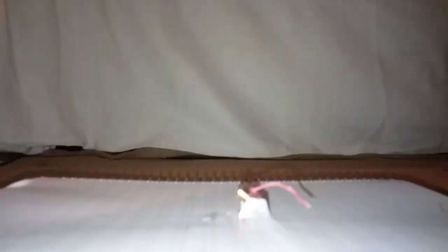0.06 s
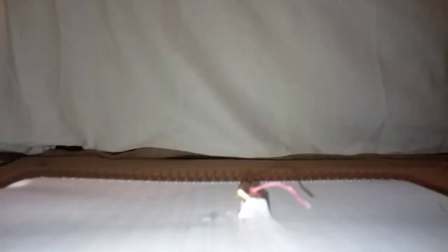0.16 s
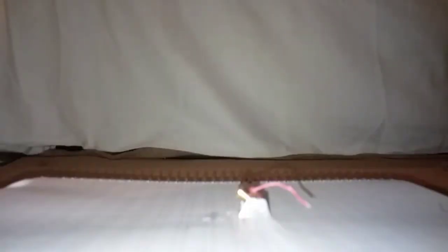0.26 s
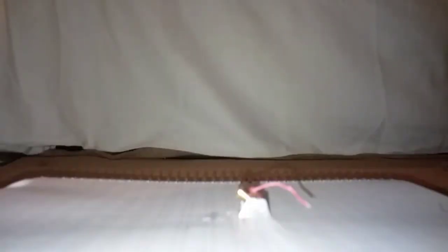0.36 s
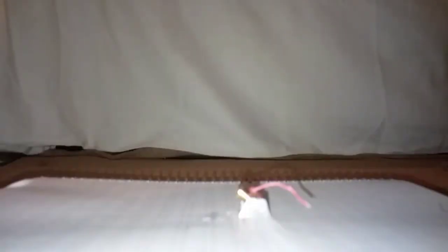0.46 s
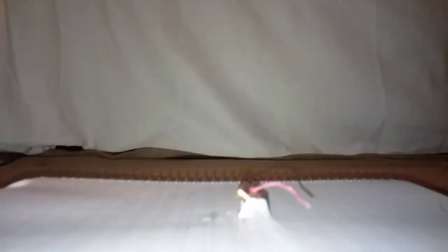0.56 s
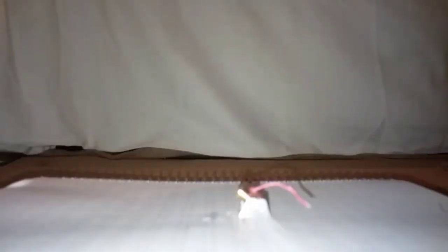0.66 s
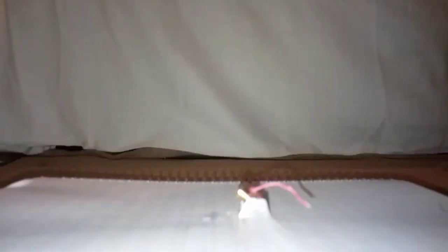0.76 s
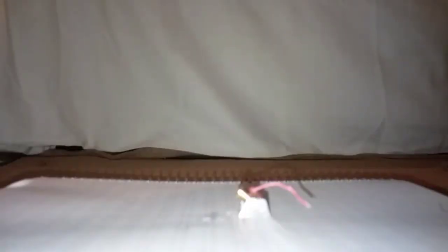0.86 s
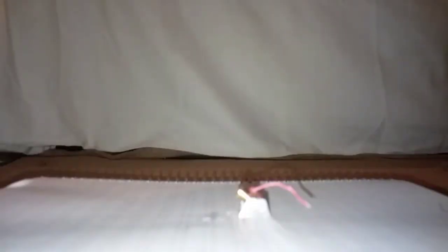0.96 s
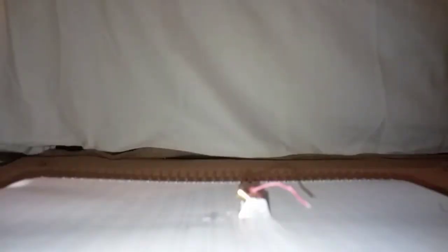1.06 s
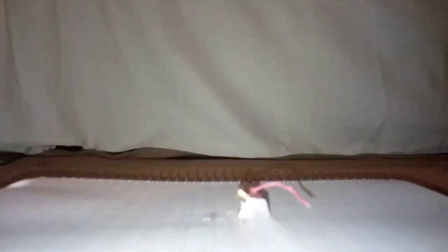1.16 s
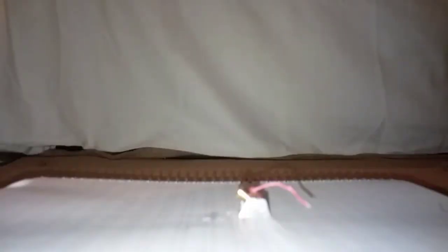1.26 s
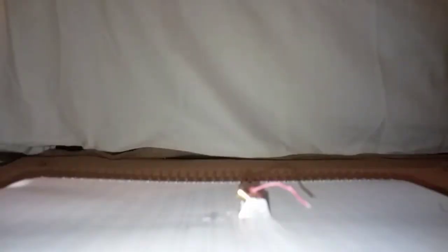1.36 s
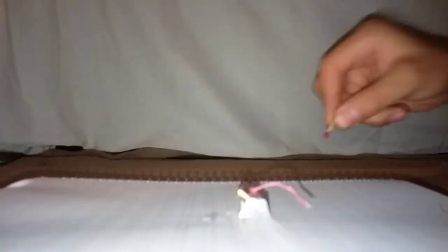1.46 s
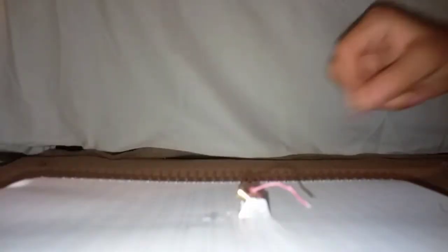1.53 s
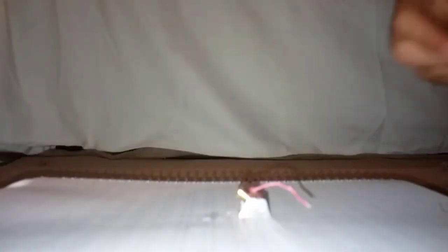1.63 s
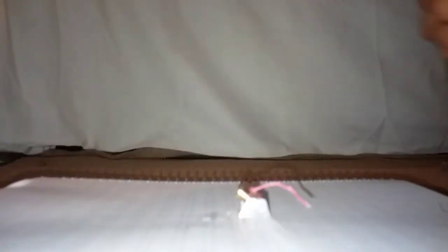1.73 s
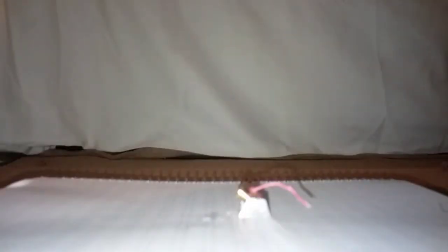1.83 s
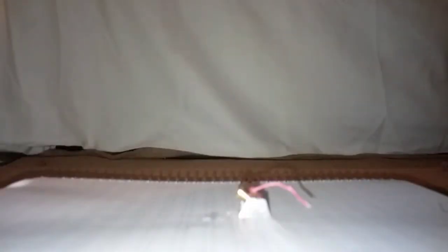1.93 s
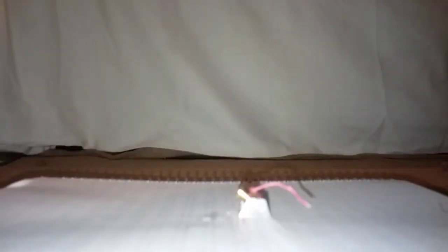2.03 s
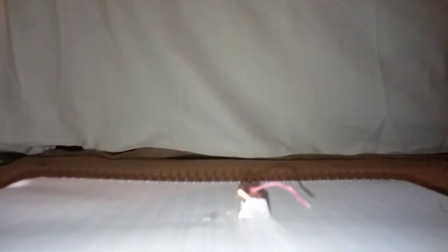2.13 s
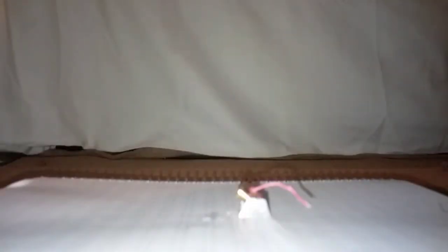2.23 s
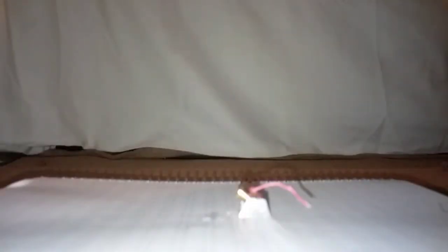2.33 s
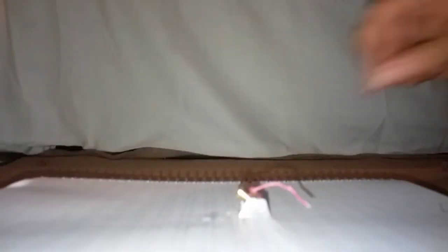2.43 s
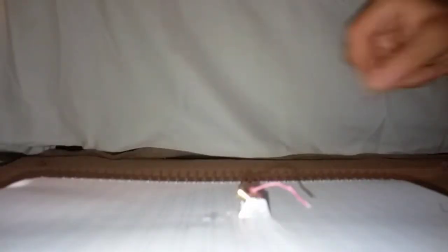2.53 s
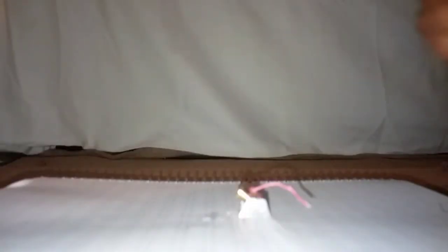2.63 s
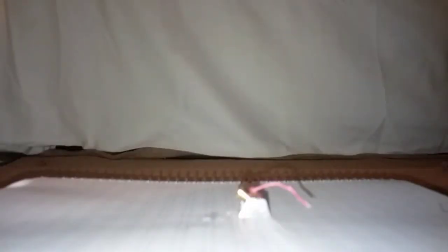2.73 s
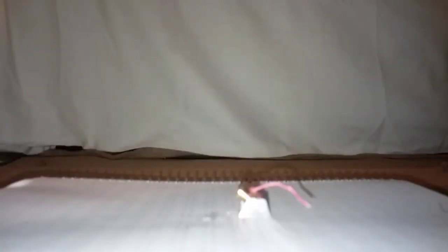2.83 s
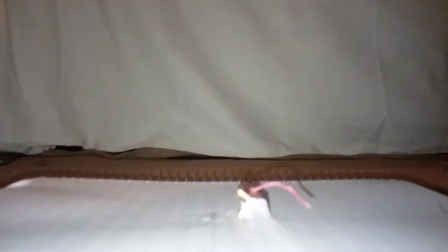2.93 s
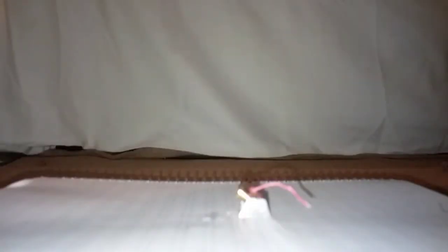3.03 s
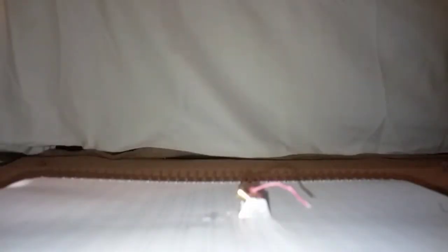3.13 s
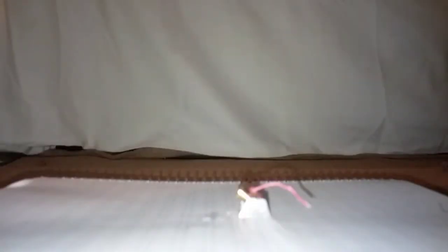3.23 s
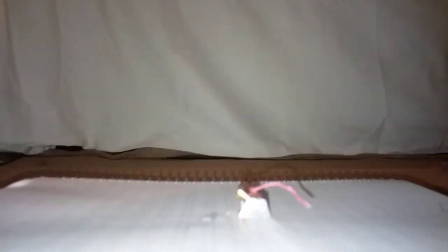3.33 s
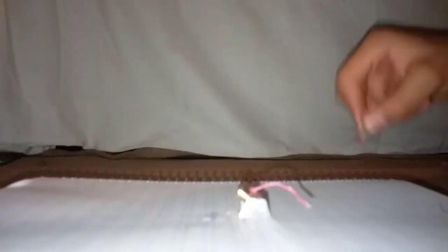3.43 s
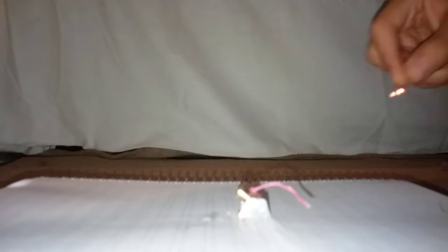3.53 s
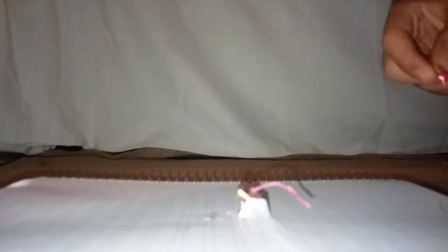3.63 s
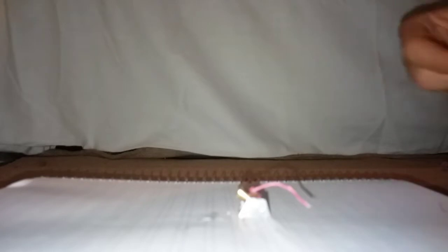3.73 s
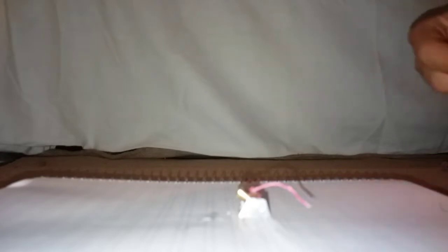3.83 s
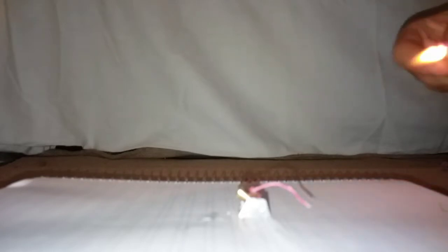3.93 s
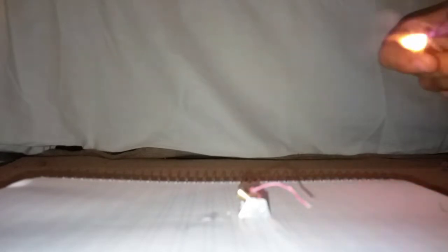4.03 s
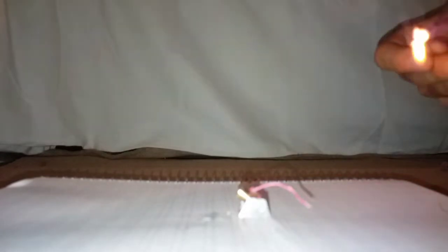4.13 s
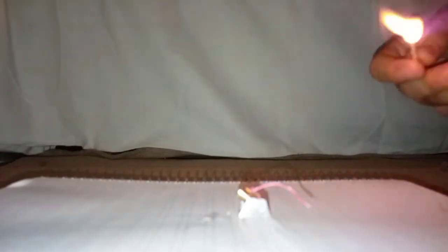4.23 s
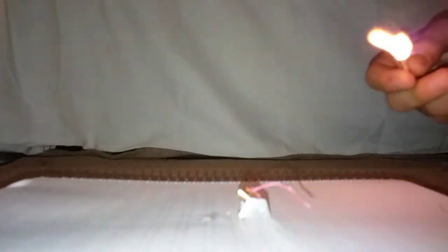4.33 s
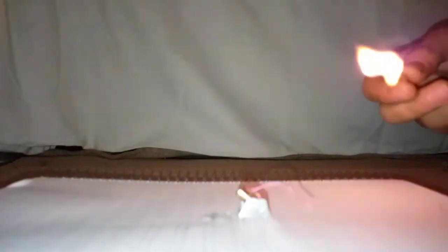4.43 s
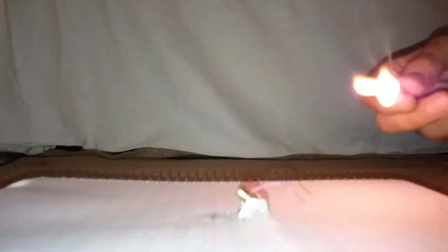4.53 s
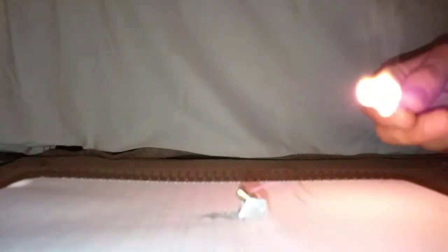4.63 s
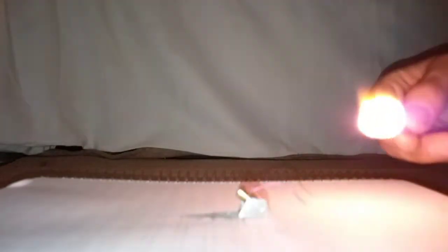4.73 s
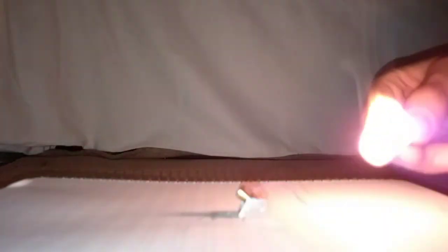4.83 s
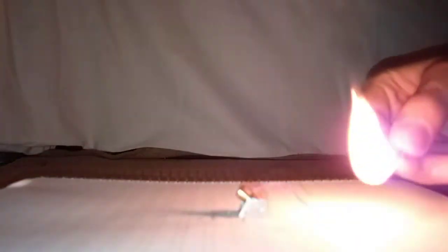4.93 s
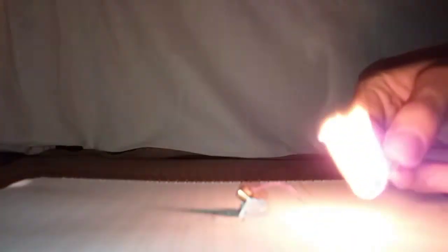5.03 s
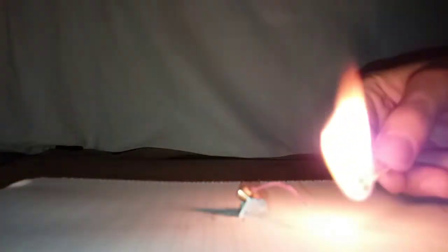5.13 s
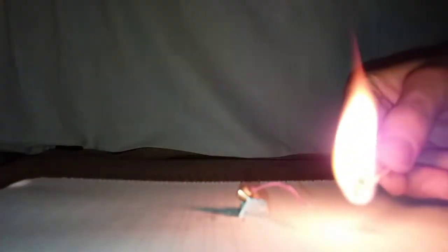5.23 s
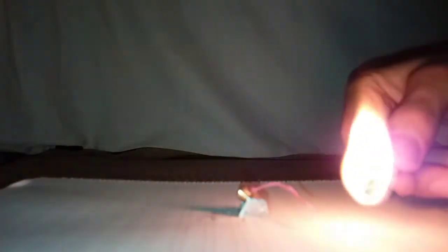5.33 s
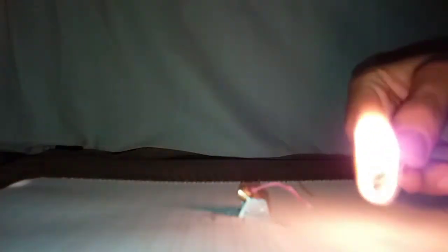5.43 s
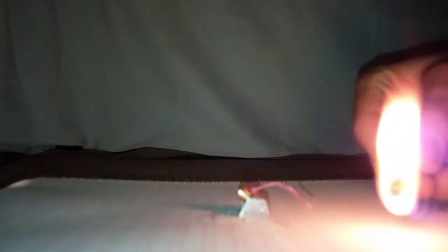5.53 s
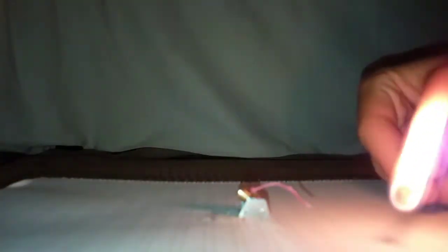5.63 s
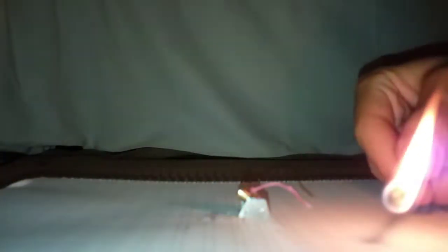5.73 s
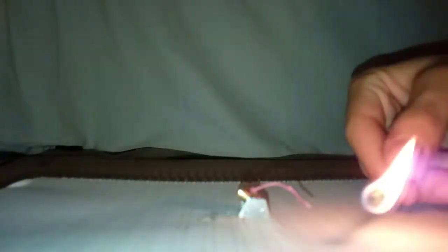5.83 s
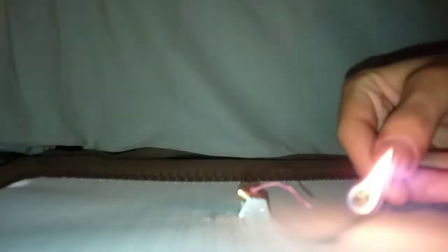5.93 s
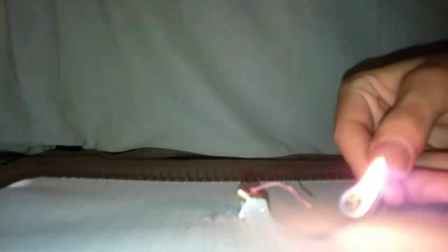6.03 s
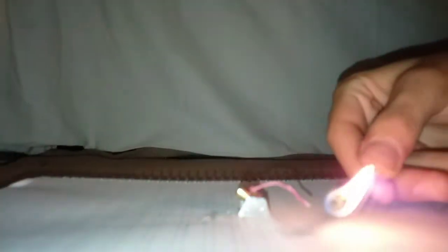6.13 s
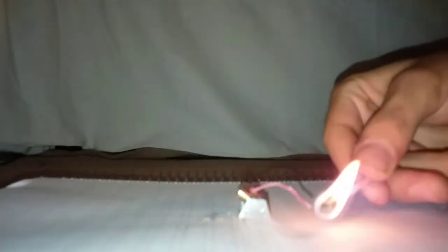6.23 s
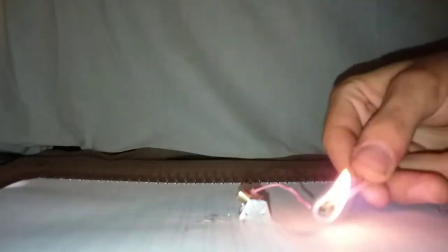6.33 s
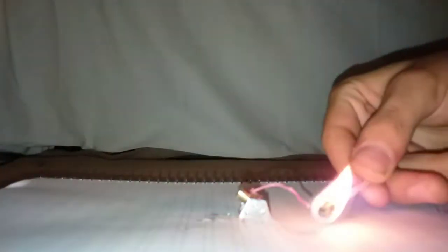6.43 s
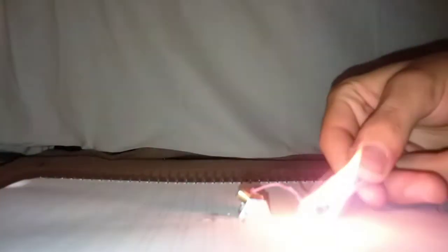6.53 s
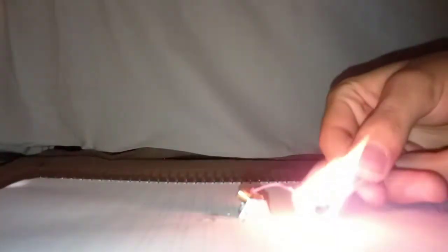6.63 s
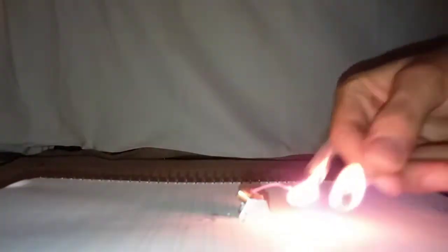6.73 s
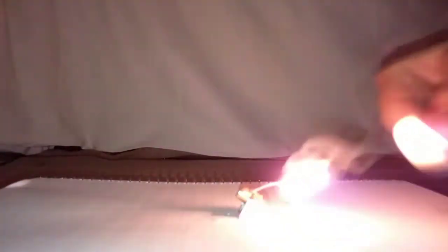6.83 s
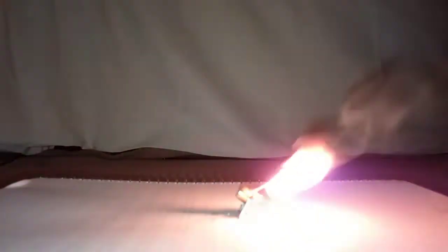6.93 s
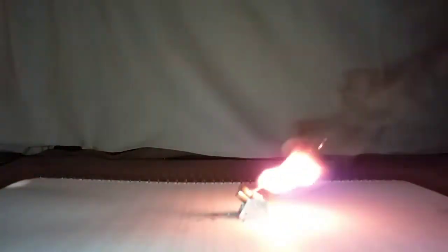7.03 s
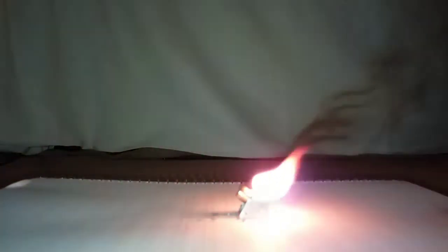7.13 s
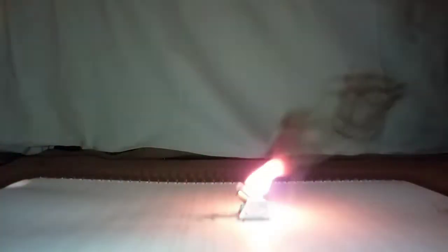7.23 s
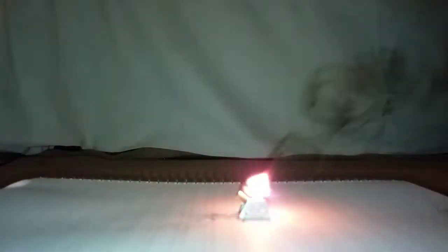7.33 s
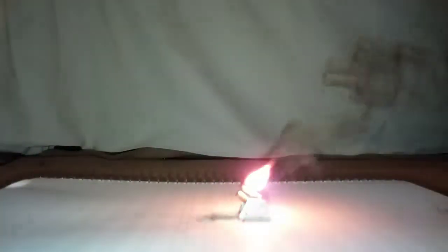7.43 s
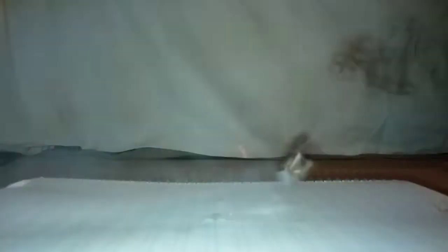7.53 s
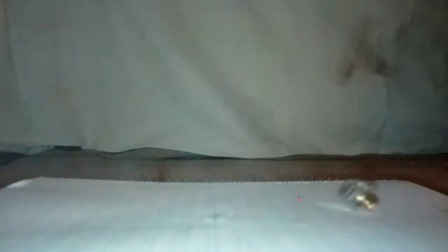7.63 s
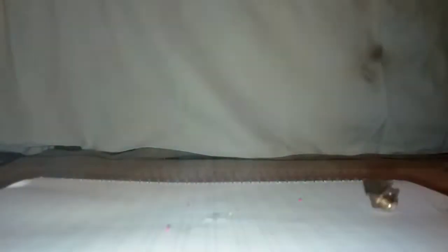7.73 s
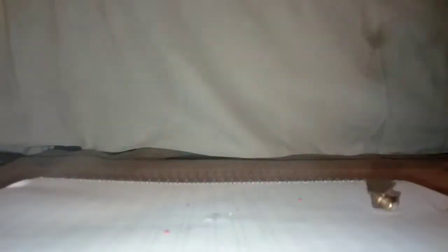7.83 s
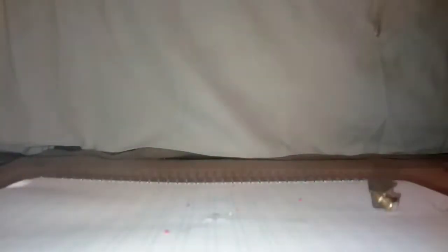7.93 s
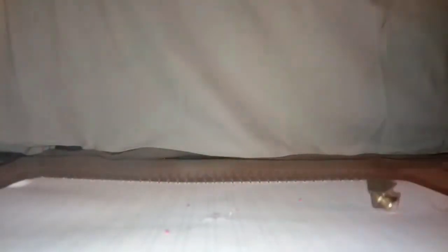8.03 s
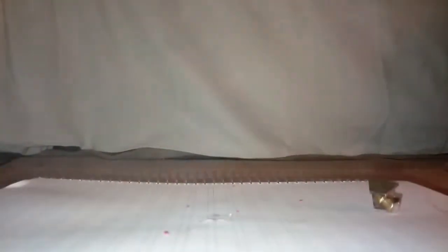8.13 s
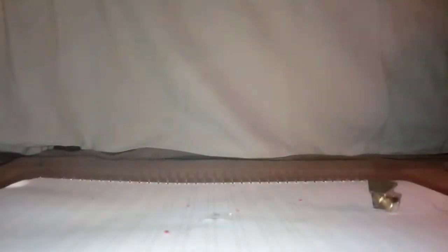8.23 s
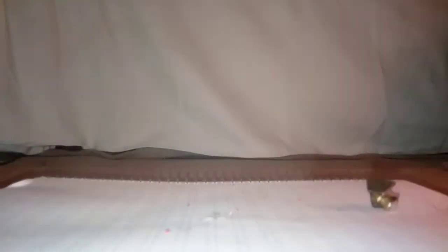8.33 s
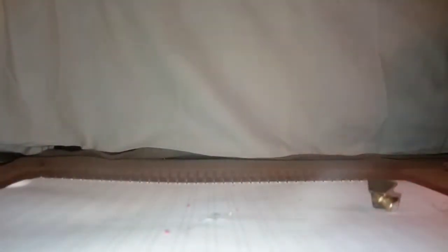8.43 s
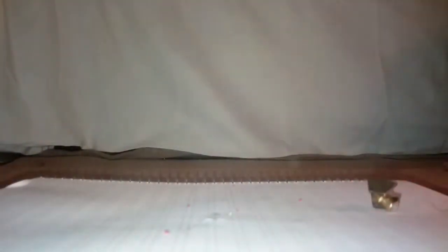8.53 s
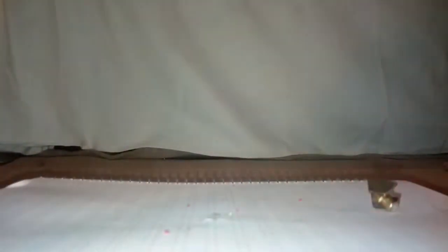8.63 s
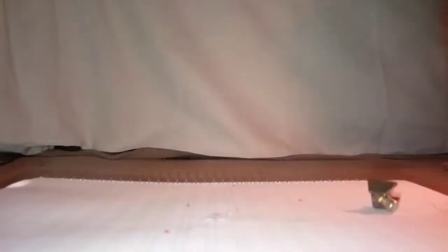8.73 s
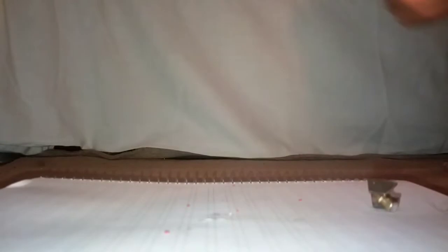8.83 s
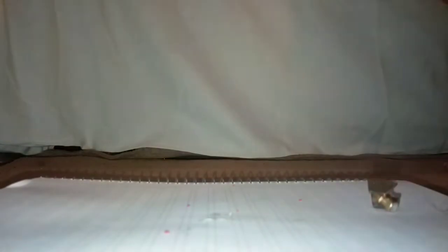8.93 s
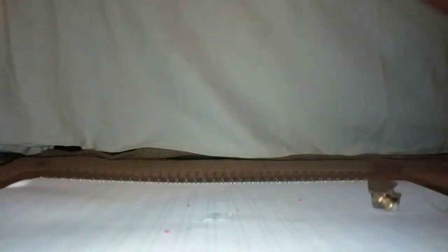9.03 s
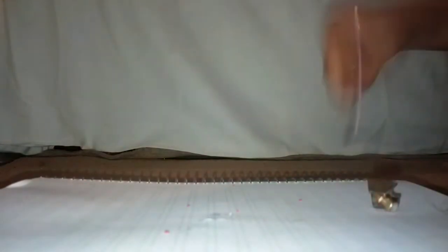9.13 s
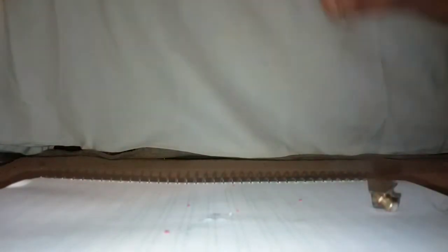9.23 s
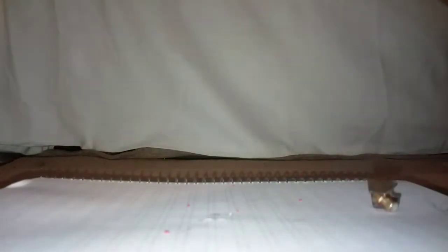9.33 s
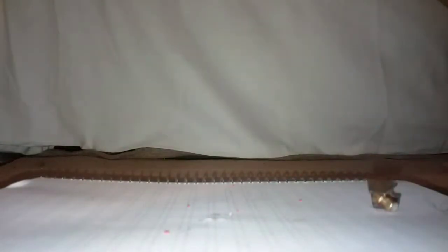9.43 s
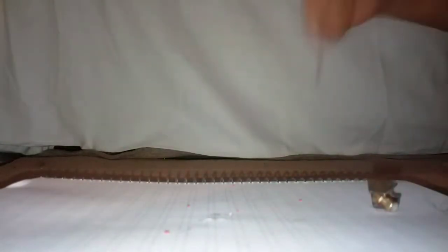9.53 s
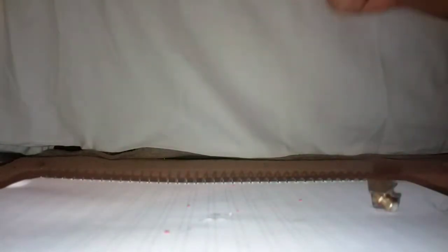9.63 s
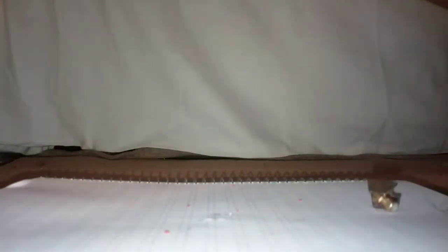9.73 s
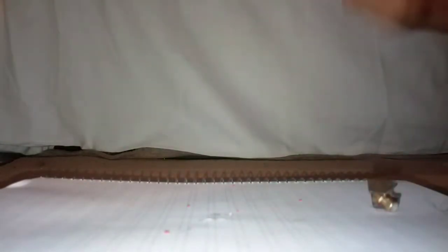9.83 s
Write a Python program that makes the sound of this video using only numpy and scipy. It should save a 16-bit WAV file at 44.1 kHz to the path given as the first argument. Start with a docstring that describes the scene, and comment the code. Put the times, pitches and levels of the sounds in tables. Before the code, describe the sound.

A match scrapes and catches, a fuse sizzles, then a tiny cannon fires one sharp bang in a small room with a low hum.

```python
"""Over a small room's low hum, a match scrapes and snags on its box, grit shaking the cardboard.
It catches, flares and crackles as powder grains burst in hot gas, then lights a tiny cannon's fuse.
The fuse sizzles and spits; the cannon's pressure pulse fills the room, and loose bits clatter down.
A limiter flattens the bang, and gain control keeps the room hushed for a second afterwards."""
import sys
import numpy as np
from scipy import signal
from scipy.io import wavfile
from scipy.ndimage import uniform_filter1d

SR = 44100
rng = np.random.default_rng(int(sys.argv[2]) if len(sys.argv) > 2 else 0)


def put_to_file(sound):
    """Save the sound as 16-bit audio at rate SR, in the file named by the first command-line argument."""
    columns = np.atleast_2d(sound).T  # one column per channel
    safe = np.clip(columns, -1, 1)
    whole_steps = np.round(safe * 32767)
    wavfile.write(sys.argv[1], SR, whole_steps.astype(np.int16))


N = 435266
TIME = np.arange(N) / SR

# spectra of burning powder: (frequency [Hz], level [dB])
GAS_FLUTTER = [(100, -14), (260, 0), (430, -6), (620, 1), (780, 3), (980, -7), (1350, -6), (2000, -27.5),
               (4000, -54.5)]
GRAIN_POP = [(200, -13), (700, -0.5), (2500, 0.5), (5000, -2), (8200, -4), (9200, -13), (12000, -14.5),
             (16000, -5)]
FUSE_SPECTRUM = [(710, -33.5), (1200, -7.5), (1370, -3.5), (1870, -8), (2130, -5), (3360, -6.5),
                 (4500, -6.5), (7910, -7.5), (9110, -16), (12700, -14), (16000, -12.5)]


def amp(db):
    """Decibels to gain."""
    return 10 ** (np.asarray(db) / 20)


def unit_rms(x):
    """Scale to rms 1."""
    return x / np.sqrt(np.mean(x ** 2) + 1e-20)


def lookup(points, hz):
    """Interpolate a table over log frequency."""
    table_hz, value = np.transpose(points)
    return np.interp(np.log(hz + 1), np.log(table_hz), value)


def add(mix, start_s, sound):
    """Mix a sound in at start_s."""
    part = mix[round(start_s * SR):][:len(sound)]
    part += sound[:len(part)]


def band(x, lo_hz, hi_hz):
    """Gentle band-pass."""
    return signal.sosfilt(signal.butter(2, [lo_hz, hi_hz], "band", fs=SR, output="sos"), x)


def click(spectrum, size=4096):
    """Minimum-phase pulse with this spectrum, peak 1."""
    log_gain = np.log(amp(lookup(spectrum, abs(np.fft.fftfreq(size, 1 / SR)))))
    pulse = np.fft.ifft(np.exp(np.conj(signal.hilbert(log_gain)))).real[:size // 2]
    return pulse / abs(pulse).max()


def colour(x, spectrum):
    """Filter by a spectrum, rms 1."""
    return unit_rms(signal.oaconvolve(x, click(spectrum))[:len(x)])


def wander(per_s):
    """Curve through per_s random points a second, rms 1."""
    return unit_rms(np.interp(TIME * per_s, np.arange(N // 20), rng.standard_normal(N // 20)))


def grains(per_s, spread_db):
    """Random impulses, a few much larger than the rest; equal power at any rate."""
    size = amp(spread_db * np.minimum(rng.exponential(1, N), 3.5))
    return unit_rms(size / np.sqrt(per_s) * rng.choice([-1, 1], N) * (rng.random(N) < per_s / SR))


def ring(modes):
    """Decaying modes after one blow, peak 1."""
    t = TIME[:SR // 8]
    wave = sum(amp(db - 60 * t / t60_s) * np.sin(2 * np.pi * (hz * t + rng.random()))
               for hz, db, t60_s in modes)
    return wave / abs(wave).max()


def tail(decay):
    """Dense reflections, each band with its own t60; energy 1."""
    hz, t, bins = signal.stft(rng.standard_normal(SR * 3 // 2), SR, nperseg=256)
    wave = signal.istft(bins * amp(-60 * t / lookup(decay, hz)[:, None]), SR, nperseg=256)[1]
    return wave / np.linalg.norm(wave)


def room_tone(rumble_db=-46.5, hiss_trim_db=-2.0, throb=.25, waver_hz=2.5):
    """A wavering hum over low room noise and thin hiss."""
    # noise spectra and hum partials: (frequency [Hz], level [dB])
    rumble_spectrum = [(18, -57), (30, -24.5), (65, -13), (81, -6.5), (102, -1.5), (173, -12.5),
                       (203, -12.5), (314, -15.5), (346, -26), (412, -19.5), (440, -32.5), (588, -19.5),
                       (797, -30), (837, -31), (1400, -50), (1820, -77), (3080, -120)]
    hiss_spectrum = [(900, -28), (1400, -6.5), (1700, -11), (2200, -11), (3100, -11.5), (3800, 0),
                     (5000, -2.5), (5600, -9), (8000, -10), (9200, -16.5), (16000, -17)]
    hum_partials = [(100, -47.5), (207, -61), (315, -60), (408, -70), (672, -68.5), (782, -68)]
    # hiss drift: (time [s], level before trim [dB])
    hiss_drift = [(.1, -61), (.8, -66.5), (1.2, -65), (1.7, -70.5), (2.3, -71), (3.1, -65), (6.2, -64),
                  (9.8, -66)]
    out = amp(rumble_db) * colour(rng.standard_normal(N), rumble_spectrum)
    hiss_db = np.interp(TIME, *np.transpose(hiss_drift)) + hiss_trim_db
    out += amp(hiss_db) * colour(rng.standard_normal(N), hiss_spectrum)
    for hz, db in hum_partials:
        cycles = np.cumsum(hz + waver_hz * wander(25)) / SR
        out += amp(db) * unit_rms((1 + throb * wander(22)) * np.sin(2 * np.pi * cycles))
    return out


def match_strikes(bite_s=.0096, release_s=.0034, ease_db=24, box_db=-10, top_db=-6.5, wall_half_hz=375):
    """The head drags and snags on grit, shaking the box; each scrape brightens as it speeds up."""
    # strokes: (start [s], end [s], level [dB], pressure crest [0-1], brightness [dB],
    # box wall pitch [Hz], wall ring [dB])
    strokes = [(0.303, 0.342, -53.5, 0.47, -4, 2300, -20), (0.458, 0.502, -60, 0.55, -2, 2300, -9),
               (1.304, 1.351, -23.5, 0.8, 1.5, 2320, -4.5), (1.936, 1.983, -44, .38, -13, 2030, -0.5),
               (2.308, 2.35, -26.5, .64, 0.5, 2270, -4), (3.276, 3.317, -21.5, 0.7, 5, 1950, -9)]
    # head catching on the box: (time [s], snap [dB], box ring [dB])
    snags = [(.876, -37, -54), (1.3005, -42, -35), (1.310, -38, -27), (1.3375, -7, -14), (1.3502, -30, -19),
             (1.881, -43, -39), (2.3365, -10, -17), (2.809, -29, -42), (3.291, -6, -24), (3.315, -22, -10)]
    # matchbox modes: (frequency [Hz], level [dB], t60 [s])
    box_modes = [(340, -18, .03), (1080, -16, .02), (1760, -2, .018), (2060, -4, .016), (2210, 0, .022),
                 (2660, -5, .016), (2850, -5, .018), (5000, -6, .008)]
    # scrape and snag spectra: (frequency [Hz], level [dB])
    rasp_spectrum = [(120, -38.5), (200, -0.5), (482, -9), (683, -8.5), (1080, -7), (1480, -36.5),
                     (1740, -17), (2170, -14.5), (2800, -4.5), (3130, -2.5), (5520, 1.5), (7270, -6.5),
                     (7970, 0), (9230, -13), (16000, -8)]
    snap_spectrum = [(150, -30), (400, -14), (1400, -15), (1800, -3), (2300, 0), (5500, 0), (8000, -5),
                     (9500, -13), (16000, -11)]
    out = np.zeros(N)
    rasp = colour(grains(12000, spread_db=2.5), rasp_spectrum)
    box = unit_rms(signal.oaconvolve(grains(9000, spread_db=2.5), ring(box_modes))[:N])
    top = unit_rms(band(grains(9000, spread_db=2.5), 10500, 17000))
    judder = unit_rms(amp(2.5 * np.tanh(wander(450))))  # stick-slip
    for start_s, end_s, db, crest, bright_db, wall_hz, wall_db in strokes:
        at = np.arange(round(start_s * SR), round(end_s * SR))
        progress = np.linspace(0, 1, len(at))
        bite = np.clip((TIME[at] - start_s) / bite_s, 0, 1)
        release = np.clip((end_s - TIME[at]) / release_s, 0, 1)
        pressure = bite * release * judder[at] * amp(-ease_db * (progress - crest) ** 2)
        wall = band(rng.standard_normal(SR // 4), wall_hz - wall_half_hz, wall_hz + wall_half_hz)
        scrape = rasp[at] + amp(box_db) * box[at] + amp(wall_db) * unit_rms(wall[-len(at):])
        scrape += amp(top_db + bright_db) * progress * top[at]
        add(out, start_s, amp(db) * pressure * scrape)
    snap, knock, t = click(snap_spectrum), ring(box_modes), TIME[:SR // 100]
    for start_s, snap_db, ring_db in snags:
        crumbs = .2 * np.exp(-t / .0008) * rng.standard_normal(len(t))  # grit gives way
        crumbs[0] = 1
        crack = signal.fftconvolve(crumbs, snap)
        add(out, start_s, amp(snap_db) * crack / abs(crack).max())
        add(out, start_s, amp(ring_db) * knock)
    return out


def room(x, wet_db=-16.7, delay_s=.008):
    """Add the small room's soft tail; cloth absorbs the top."""
    # room decay: (frequency [Hz], t60 [s])
    room_decay = [(100, .6), (800, .45), (2500, .42), (6000, .41), (10000, .32), (15000, .26)]
    # reflection spectrum: (frequency [Hz], level [dB])
    room_spectrum = [(100, -2), (1500, -4), (2000, -4), (2500, 1), (3300, -2), (6000, 0), (8000, -3),
                     (10000, -6), (16000, -7)]
    response = signal.oaconvolve(tail(room_decay), click(room_spectrum))
    out = x.copy()
    add(out, delay_s, amp(wet_db) * signal.oaconvolve(x, response / np.linalg.norm(response)))
    return out


def burning(heat, spectrum, full_per_s, spent_s, spent_share, sputter_db, sizzle_db, flutter_db,
            growth_db_per_s, thinning_s=.12, crackle_per_s=40, crackle_db=16):
    """Tiny bursts sizzle over hot gas: denser with heat, thinning to a crackle as the powder runs out."""
    times_s, levels_db = np.transpose(heat)
    start_s, end_s = times_s[0], times_s[-1]
    heat_db = np.interp(TIME, times_s, levels_db)
    spent = np.clip((TIME - spent_s) / thinning_s, 0, 1)
    per_s = full_per_s * amp(heat_db - levels_db.max()) * spent_share ** spent
    bursts = grains(per_s, spread_db=4.5)
    gas = np.sqrt(per_s / 9000) * rng.standard_normal(N)  # denser bursts, smoother rush
    sizzle = amp(sizzle_db) * colour(bursts + gas, spectrum)
    flame_db = flutter_db + growth_db_per_s * (np.clip(TIME, start_s, end_s) - start_s)
    flutter = amp(flame_db) * colour(.5 * bursts + gas, GAS_FLUTTER)
    small_pops = spent * rng.random(N) * (rng.random(N) < crackle_per_s / SR)
    crackle = amp(crackle_db) * signal.oaconvolve(small_pops, click(GRAIN_POP))[:N]
    alight = uniform_filter1d(1. * (TIME > start_s) * (TIME < end_s), size=600)
    sputter = unit_rms(amp(sputter_db * np.tanh(wander(170))))
    return alight * amp(heat_db) * ((sizzle + flutter) * sputter + crackle)


def reflected(x, path):
    """Echo off a near surface; its comb sweeps as the source moves."""
    times_s, delay_s, strength = np.transpose(path)
    share = np.interp(TIME, times_s, strength)
    echo = np.interp(TIME - np.interp(TIME, times_s, delay_s), TIME, x)
    return (x + share * echo) / np.sqrt(1 + share ** 2)


def match_flame():
    """The head flares and the flame grows; hand and table reflect it as it is carried."""
    # burn strength: (time [s], level [dB])
    heat = [(3.37, -54), (3.5, -44), (3.66, -54), (3.9, -42.5), (4.24, -48.5), (4.63, -43.0), (4.92, -43.5),
            (5.32, -46.5), (5.4, -52.5), (5.66, -66)]
    # sizzle spectrum: (frequency [Hz], level [dB])
    spectrum = [(710, -40.5), (1200, -22), (1380, -3), (1790, -2.5), (2110, 2.5), (2950, 0.5), (4220, 0),
                (8000, -7.5), (9310, -12), (15000, -14.5), (16000, -18.5)]
    # moving reflections: (time [s], delay [s], strength [ratio])
    off_hand = [(3.3, 0.00012, 0.47), (3.9, 0.00014, 0.64), (4.3, 0.00014, 0.56), (4.55, 0.00013, 0.4)]
    off_table = [(4.15, .00057, 0), (4.35, .00068, .38), (4.6, .00082, .4), (5.0, .0009, .18),
                 (5.4, .00093, 0)]
    flame = burning(heat, spectrum, full_per_s=4500, spent_s=5.06, spent_share=.25,
                    sputter_db=4.0, sizzle_db=-.2, flutter_db=-8.5, growth_db_per_s=3.7)
    return reflected(reflected(flame, off_hand), off_table)


def spitting(fizz_db=-15, fizz_s=.0012, rush_db=-8):
    """Burning powder throws short gas jets; single grains pop with a wisp of fizz."""
    # gas jets: (start [s], end [s], level [dB])
    jets = [(3.535, 3.568, -39), (3.705, 3.722, -35.5), (3.744, 3.756, -36), (3.783, 3.79, -39.5),
            (5.055, 5.1, -42), (5.492, 5.547, -39.5), (6.734, 6.765, -36.5), (6.83, 6.865, -37.5),
            (7.394, 7.43, -44.5)]
    # loudest grains: (time [s], level [dB])
    pops = [(3.6285, -20), (3.707, -27), (3.8116, -24.5), (3.8407, -23), (3.989, -22), (4.2097, -25.5),
            (4.728, -25), (5.175, -22), (5.231, -13.5), (5.306, -19), (5.316, -17), (5.35, -19),
            (5.411, -22.5), (5.4926, -20.5), (5.5878, -25), (7.2056, -14.5), (7.2336, -15.5), (7.2397, -18),
            (7.245, -13), (7.3316, -16.5), (7.3577, -18.5)]
    out = np.zeros(N)
    jet = colour(grains(9000, spread_db=1.8), FUSE_SPECTRUM)
    jet += amp(rush_db) * colour(rng.standard_normal(N), GAS_FLUTTER)
    for start_s, end_s, db in jets:
        part = jet[round(start_s * SR):round(end_s * SR)]
        add(out, start_s, amp(db) * part * signal.windows.tukey(len(part), .2))
    t, pop = TIME[:SR // 40], click(GRAIN_POP)
    for start_s, db in pops:
        burst = amp(fizz_db) * np.exp(-t / fizz_s) * rng.standard_normal(len(t))
        burst[0] = 1
        add(out, start_s, amp(db) * signal.fftconvolve(burst, pop))
    return out


def fuse():
    """The fuse's powder sizzles densely while its flame shrinks."""
    # burn strength: (time [s], level [dB])
    heat = [(6.4, -64), (6.53, -45), (6.7, -46), (6.77, -39.5), (7.03, -43.5), (7.14, -39), (7.2, -46),
            (7.33, -45.5), (7.37, -55.0), (7.455, -54.5)]
    return burning(heat, FUSE_SPECTRUM, full_per_s=7500, spent_s=7.15, spent_share=.63,
                   sputter_db=4.5, sizzle_db=-1.5, flutter_db=-3.5, growth_db_per_s=-2.3)


def cannon(shot_s=7.4638, blast_db=32, front_db=5, front_s=.00033, ring_hz=1502, ring_db=-23.5):
    """One pressure pulse, the room's roar of reflections and a faint metallic ring."""
    # blast spectrum: (frequency [Hz], level [dB])
    blast_spectrum = [(30, -36), (60, -11), (110, 0), (170, 1), (240, -1), (420, -1.5), (700, -0.5),
                      (1000, 2), (1750, -3), (3800, -2), (5500, -6), (8100, -9.5), (9200, -15),
                      (15500, -11)]
    # blast decay: (frequency [Hz], t60 [s])
    blast_decay = [(60, .62), (200, .5), (800, .44), (3500, .45), (5500, .39), (8000, .33), (10000, .25),
                   (15000, .205)]
    out, t = np.zeros(N), TIME[:SR * 3 // 2]
    roar = signal.oaconvolve(tail(blast_decay), click(blast_spectrum))[:len(t)]
    roar /= np.std(roar[:SR // 20])
    front = amp(front_db) * (1 - t / front_s) * np.exp(-t / front_s)
    add(out, shot_s, amp(blast_db) * (front + roar))
    fade = amp(-60 * t / 1.7) * np.sqrt(1 - t / t[-1])
    add(out, shot_s, amp(ring_db) * fade * np.sin(2 * np.pi * ring_hz * t))
    return out


def clatter(chatter=.22, chatter_s=.003, detune=.074):
    """Loose bits and the cannon hit the board; each knock chatters and rings a little differently."""
    # bits landing: (time [s], peak [dB], upper edge [Hz])
    bits = [(7.843, -13, 9000), (7.944, -19, 2200), (7.967, -19, 5000), (8.03, -24, 2400),
            (8.2844, -35, 3210), (8.4046, -37, 2000), (9.0611, -45, 850)]
    # knock modes: (frequency [Hz], level [dB], t60 [s])
    knock_modes = [(320, -12, .04), (720, -7, .02), (1100, -4, .014), (1850, 0, .013), (2150, -2, .012),
                   (2750, 0, .012), (3300, 0, .013), (5400, -12, .007)]
    out, t = np.zeros(N), TIME[:SR // 50]
    for start_s, peak_db, edge_hz in list(bits) + bounces():
        contact = chatter * rng.standard_normal(len(t)) * np.exp(-t / chatter_s)
        contact[0] = 1
        modes = [(hz * (1 + detune * rng.uniform(-1.2, 1)), db, t60_s) for hz, db, t60_s in knock_modes]
        knock = signal.fftconvolve(contact, ring(modes))
        knock = band(band(knock, 150, edge_hz), 150, edge_hz)
        add(out, start_s, amp(peak_db) * knock / abs(knock).max())
    return out


def rocking(start_s=8.05, hold_s=.25, level_db=-38, fade_db_per_s=60):
    """The cannon rocks to rest; tiny contacts shake the board."""
    # board response: (frequency [Hz], level [dB])
    board_spectrum = [(100, -20), (230, -7), (310, 9.5), (420, -9), (600, 2.5), (780, -1), (1000, -9),
                      (2000, -16), (3400, -21), (6000, -27), (12000, -59)]
    age_s = TIME - start_s
    envelope = (age_s > 0) * amp(level_db - fade_db_per_s * np.maximum(age_s - hold_s, 0))
    return envelope * colour(grains(700, spread_db=3), board_spectrum)


def bounces(landing_s=8.1093, landing_db=-16.5, gap_s=.029, gap_ratio=.85, loss_db=4.2, edge_hz=3350):
    """The cannon's bounces, each sooner and softer: (time [s], peak [dB], upper edge [Hz])."""
    gaps_s = gap_s * gap_ratio ** np.arange(7)
    times_s = landing_s + np.cumsum(gaps_s) - gaps_s
    return [(time_s, landing_db - loss_db * k, edge_hz) for k, time_s in enumerate(times_s)]


def scene():
    """All sources at one microphone, alike in both channels."""
    close = match_flame() + fuse() + match_strikes() + spitting() + clatter() + rocking()
    mono = room(close) + cannon() + room_tone()
    return np.array([mono, mono])


def record(dry, trigger_db=3, duck_db=20.5, hold_s=.94, recover_s=.21, limit_db=-10.5, ratio=11):
    """Gain control that ducks, holds and recovers; fast limiter; clipping; band limits."""
    dry = signal.sosfilt(signal.butter(3, 50, "high", fs=SR, output="sos"), dry)
    power = uniform_filter1d(dry[0] ** 2, size=200, origin=55)
    level = np.sqrt(abs(power) + 1e-12)
    since_loud_s = TIME - np.maximum.accumulate(np.where(level > amp(trigger_db), TIME, -np.inf))
    gain = amp(-duck_db * np.exp(-np.maximum(since_loud_s - hold_s, 0) / recover_s))
    gain *= np.minimum(1, amp(limit_db) / (level * gain)) ** (1 - 1 / ratio)  # limiter
    clipped = np.clip(dry * gain, -.85, .85)
    clipped = signal.sosfilt(signal.butter(2, 36, "high", fs=SR, output="sos"), clipped)
    low_pass = signal.firwin(511, 15880, window=("kaiser", 9), fs=SR)
    return signal.oaconvolve(clipped, low_pass[None], "same", axes=1)


dry = scene()
out = record(dry)
put_to_file(out)
```